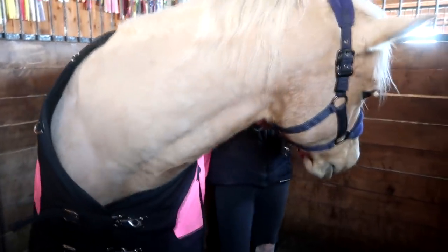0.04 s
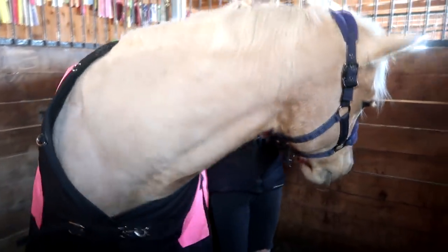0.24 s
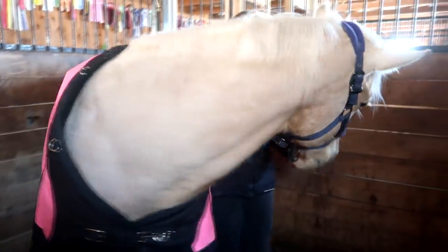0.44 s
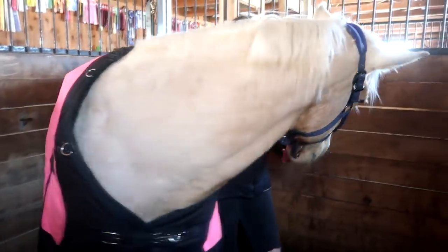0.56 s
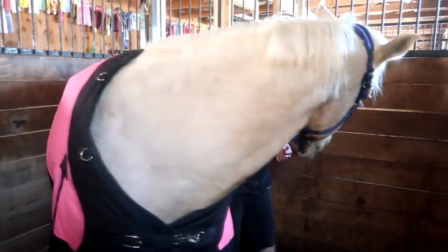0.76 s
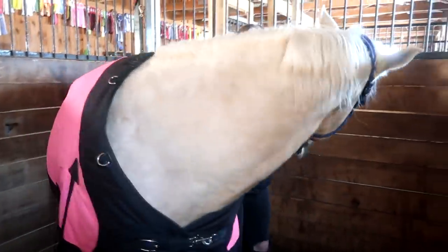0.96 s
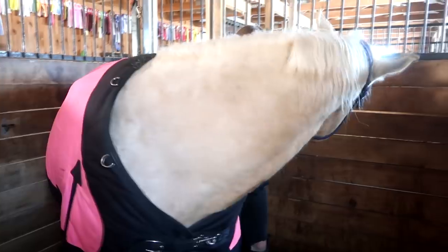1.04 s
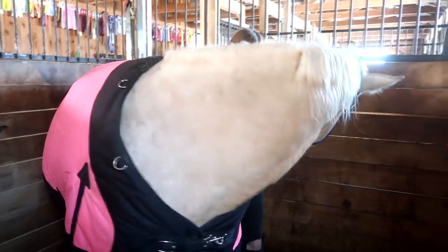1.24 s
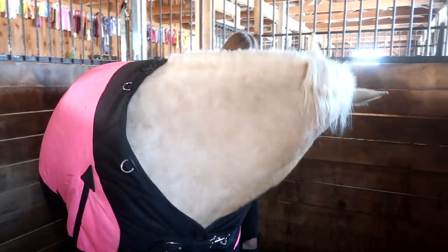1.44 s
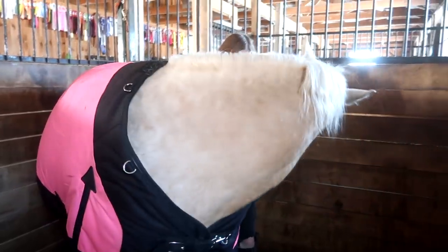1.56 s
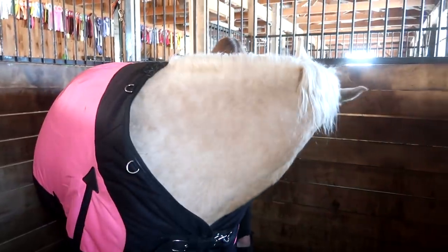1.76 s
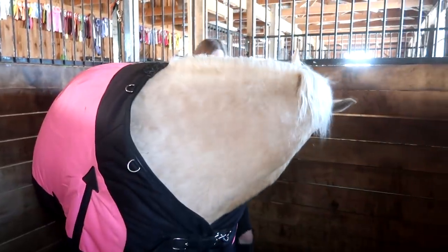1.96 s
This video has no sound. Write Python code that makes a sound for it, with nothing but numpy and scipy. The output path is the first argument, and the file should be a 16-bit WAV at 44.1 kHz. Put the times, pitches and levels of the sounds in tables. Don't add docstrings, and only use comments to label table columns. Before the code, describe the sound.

Hoof knocks and short scrapes on hollow stall boards, with soft bedding rustle in a quiet barn

```python
import sys
import numpy as np
from scipy import signal
from scipy.fft import rfft, irfft
from scipy.io import wavfile
from scipy.ndimage import uniform_filter1d

SR = 44100
rng = np.random.default_rng(int(sys.argv[2]) if len(sys.argv) > 2 else 0)


def wav_out(sig):
    wavfile.write(sys.argv[1], SR, np.round(np.clip(np.atleast_2d(sig).T, -1, 1) * 32767).astype(np.int16))


def to_linear_factor(level_db):
    exponent = np.asarray(level_db, float) / 20
    return 10 ** exponent


N = 88200


def evened(x):
    return x / np.sqrt(np.mean(x ** 2) + 1e-20)


def read(points, hz):
    f, value = np.transpose(points)
    return np.interp(np.log(hz + 1), np.log(f + 1), value)


def add(mix, s, sound):
    part = mix[round(s * SR):][:len(sound)]
    part += sound[:len(part)]


def resonate(x, hz, width):
    turn = np.exp(2j * np.pi * hz * np.arange(len(x)) / SR)
    r = np.exp(-np.pi * width / SR)
    return 2 * (turn * signal.lfilter([1 - r], [1, -r], x / turn)).real


def strokes(rows):
    t = np.arange(N) / SR
    total = np.zeros(N)
    for s, rise, hold, fall, db in rows:
        falling = to_linear_factor(db - fall * np.maximum(t - s - rise - hold, 0))
        total += falling * np.clip((t - s) / rise, 0, 1)
    return total


def grains(per_s, spread_db):
    size = rng.standard_normal(N) * to_linear_factor(spread_db * np.minimum(rng.exponential(1, N), 4))
    return evened(size * (rng.random(N) < per_s / SR))


# (frequency [Hz], level [dB per Hz])
AIR = [(20, -13.5), (45, -3.5), (70, 0.5), (200, -10), (500, -10), (1300, -16), (4900, -29.5), (14800, -50)]
AIR_DB = -49


def air():
    frames, hz = N // 256 + 5, np.fft.rfftfreq(1024, 1 / SR)
    a, b, c, d, patches = rng.standard_normal((frames, 513, 5)).T
    patches = uniform_filter1d(patches, size=12, axis=0)
    patches = evened(uniform_filter1d(patches, size=12, axis=1))
    z = np.array([a + 1j * b, c + 1j * d]) * to_linear_factor(read(AIR, hz)[:, None] + 1.7 * patches)
    return to_linear_factor(AIR_DB) * evened(signal.istft(z, nperseg=1024, noverlap=768)[1][:, :N])


# (time [s], peak level [dB])
CLICKS = [(.285, -48), (.357, -52), (.385, -46.5), (.402, -49), (0.464, -42), (.658, -43), (.686, -43.5),
          (0.691, -45), (.719, -43), (.726, -42), (.753, -46), (.759, -46), (.787, -47), (.986, -46.5),
          (1.003, -50), (1.053, -51), (1.086, -54), (1.107, -45), (1.455, -42), (1.487, -41), (1.553, -50),
          (1.57, -47), (1.62, -42), (1.715, -45), (1.754, -52), (1.77, -41.5), (1.82, -45), (1.97, -45)]
# (frequency [Hz], level [dB], t60 [s])
WING = [(3800, 0.5, 0.012), (4460, -1.5, 0.0098), (4870, -4.5, 0.0075), (5490, -3.5, 0.011)]


def insect():
    out, t = np.zeros(N), np.arange(1000) / SR
    for (s, peak_db), odd in zip(CLICKS, rng.standard_normal((len(CLICKS), len(WING)))):
        ring = 0
        for (hz, db, t60), o in zip(WING, odd):
            ring = ring + to_linear_factor(db + 2.7 * o - 60 * t / t60) * np.sin(2 * np.pi * hz * (1 + 0.023 * o) * t)
        add(out, s - .001, to_linear_factor(peak_db) * np.minimum(t / 0.00087, 1) * ring)
    return out


# (frequency [Hz], t60 [s])
STALL = [(100, 0.49), (400, 0.44), (1000, 0.36), (3000, 0.25), (9000, 0.31)]
STALL_DB, FIRST_ECHO_S = -8, .004


def stall(x):
    taps, first = np.zeros((2, SR // 2)), round(FIRST_ECHO_S * SR)
    at = np.arange(0, SR // 2 - 20, 20)
    at = at + rng.integers(0, 20, (2, len(at)))
    np.put_along_axis(taps, at, rng.choice([-1., 1.], at.shape), 1)
    hz, t, z = signal.stft(taps, SR, nperseg=256)
    tail = signal.istft(z * to_linear_factor(-60 * t / read(STALL, hz)[:, None]), SR, nperseg=256)[1]
    tail = np.pad(tail, ((0, 0), (first, 0)))
    return signal.fftconvolve(x[None], tail / np.linalg.norm(tail[0]), axes=1)[:, :N]


# (time [s], peak level [dB], pitch [Hz], t60 [s])
SNAPS = [
    (1.2345, -30.5, 3020, .012),
    (1.2345, -35, 2200, 0.011),
    (.78, -46, 2550, 0.033),
    (.806, -37, 2600, 0.094),
    (1.37, -43, 2200, 0.018),
    (1.607, -44, 3200, .02),
]


def ticks():
    out, t = np.zeros(N), np.arange(3000) / SR
    for s, peak_db, hz, t60 in SNAPS:
        rise = np.minimum(t / 0.00058, 1)
        add(out, s, to_linear_factor(peak_db - 60 * t / t60) * rise * np.sin(2 * np.pi * hz * t))
    return out


# (start [s], rise [s], hold [s], fall [dB per s], level [dB])
FIZZ = [
    (.11, .015, .02, 400, -66),
    (1.84, .02, .01, 300, -67),
    (1.884, .003, .006, 500, -62.5),
    (.53, .02, .02, 300, -72),
]


def crackle(straw):
    hz = np.fft.rfftfreq(N, 1 / SR)
    fizz = straw / (1 + (11000 / (hz + 1)) ** 10)
    return evened(irfft(fizz, N)) * strokes(FIZZ)


# (frequency [Hz], level [dB per Hz])
GRIT = [(400, -40), (800, -9), (1300, -6.5), (2400, -9), (4000, -15), (6500, -21.5), (10000, -31),
        (14800, -56)]
GRAINS_PER_S, GRAIN_SPREAD_DB, GRIT_TOP_HZ = 14000, 1.5, 11000


def grit(straw):
    hz = np.fft.rfftfreq(N, 1 / SR)
    return straw * to_linear_factor(read(GRIT, hz)) / (1 + (hz / GRIT_TOP_HZ) ** 20)


# (start [s], rise [s], hold [s], fall [dB per s], level [dB])
RUBS = [(.227, 0.002, 0.0082, 157, -42), (1.332, 0.0047, 0.0068, 309, -43), (1.38, 0.15, 0.034, 48, -54.5),
        (1.445, .008, .006, 300, -55.5), (1.5, .02, 0.0086, 252, -56), (1.545, 0.012, 0.01, 303, -54.5),
        (1.6, .008, 0.0084, 300, -54), (.378, 0.011, 0.035, 99, -48), (1.03, 0.0089, 0.017, 200, -55),
        (-.05, 0.039, 0.042, 99, -58), (.155, 0.0026, 0.0079, 199, -48), (0.49, 0.028, 0.035, 154, -55.5)]
RUB_TOP_HZ = 3480


def rubs(straw):
    hz = np.fft.rfftfreq(N, 1 / SR)
    dull = grit(straw) / (1 + (hz / RUB_TOP_HZ) ** 2)
    return evened(irfft(dull, N))[::-1] * strokes(RUBS)


# (start [s], rise [s], hold [s], fall [dB per s], level [dB])
SCUFFS = [
    (0.7948, 0.004, 0.062, 600, -37.5),
    (.87, .01, 0.036, 250, -51),
    (0.492, 0.0092, 0.05, 132, -60.5),
    (0.11, 0.018, 0.016, 199, -43.5),
    (.5, 0.048, 0.021, 209, -50.5),
    (1.831, 0.0052, 0.014, 227, -44),
    (1.95, .04, .05, 100, -56.5),
    (0.435, 0.02, .02, 206.5, -50),
    (1.398, 0.14, 0.08, 73, -55.5),
    (1.884, 0.0029, 0.0035, 598, -59),
]


def scuffs(straw):
    return evened(irfft(grit(straw), N)) * strokes(SCUFFS)


# (start [s], rise [s], hold [s], fall [dB per s], level [dB])
SHUFFLES = [
    (1.547, 0.16, 0.2, 69, -45),
    (-.05, .05, 0.23, 59.5, -48.5),
    (0.39, 0.056, 0.085, 80, -49.5),
    (.82, 0.046, 0.062, 95, -49.5),
]
SHUFFLE_HZ, SHUFFLE_WIDTH_HZ = 173, 294


def shuffles():
    low = resonate(grains(2000, 1.5), SHUFFLE_HZ, SHUFFLE_WIDTH_HZ)
    low = resonate(low, SHUFFLE_HZ, SHUFFLE_WIDTH_HZ)
    return evened(low) * strokes(SHUFFLES)


# (start [s], rise [s], hold [s], fall [dB per s], level [dB])
SCRAPES = [
    (.872, .01, 0.038, 200, -44.5),
    (0.48, 0.03, 0.05, 220, -43),
    (-0.053, .04, 0.061, 158, -48),
    (1.842, 0.0073, 0.015, 122, -38.5),
    (.39, .005, 0.045, 300, -36.5),
]
SCRAPE_HZ, SCRAPE_WIDTH_HZ = 530, 600


def scrapes(jolts):
    loose = resonate(jolts[::-1], SCRAPE_HZ, SCRAPE_WIDTH_HZ)
    loose = resonate(loose, SCRAPE_HZ, SCRAPE_WIDTH_HZ)
    return evened(loose) * strokes(SCRAPES)


# (start [s], rise [s], hold [s], fall [dB per s], level [dB])
DRAGS = [
    (.803, 0.009, 0.053, 1500, -34),
]
# (frequency [Hz], width [Hz], level [dB])
SKID = [(437, 81, -2), (251, 142, -14.5), (678, 83, -2), (1020, 72, -12), (1340, 98, -16)]


def drags(jolts):
    skid = np.zeros(N)
    for k, (hz, width, db) in enumerate(SKID):
        ring = resonate(resonate(jolts, hz, width), hz, 3 * width)
        skid += (-1) ** k * to_linear_factor(db) * ring
    return evened(skid) * strokes(DRAGS)


# (time [s], peak level [dB], pitch [Hz], held [s])
HOLLOWS = [(.3772, -12, 396.5, .011), (.3772, -14.5, 700, 0.0096), (.3776, -16.5, 530, .010),
           (.386, -25.5, 288, 0.0095), (.7948, -21, 492, .008), (.797, -32.5, 137, 0.011),
           (1.835, -29, 138, 0.011), (1.831, -22, 362, 0.0054), (1.833, -25.5, 570, 0.0058),
           (1.832, -29, 740, 0.0076), (.228, -22, 790, 0.01), (.2268, -34, 599, 0.0079),
           (.2268, -30, 1080, .010), (.2268, -31, 1900, 0.005), (.122, -25, 795, 0.012),
           (.121, -34, 560, .005), (.251, -29, 740, 0.0044), (.81, -31, 686, .008),
           (0.39, -30.5, 760, .006), (.393, -26.5, 880, .007), (1.848, -29, 693, 0.0042),
           (.508, -33.5, 600, 0.0049), (.534, -34, 470, .005), (.1557, -39, 950, .006),
           (.145, -34, 700, 0.0045)]
HOLLOW_RISE_S, HELD_DB_PER_S, DAMPED_DB_PER_S = 0.0021, 450, 2500


def hollows():
    out, t = np.zeros(N), np.arange(2000) / SR
    for s, peak_db, hz, held in HOLLOWS:
        loss_db = HELD_DB_PER_S * t + DAMPED_DB_PER_S * np.maximum(t - held, 0)
        rise = np.minimum(t / HOLLOW_RISE_S, 1)
        add(out, s, to_linear_factor(peak_db - loss_db) * rise * np.sin(2 * np.pi * hz * t))
    return out


CRUNCH_S, CRUNCHES_PER_S = 0.0062, 1500


def knocks(rows, modes, uneven_db=1.0):
    out, t = np.zeros(N), np.arange(SR // 4) / SR
    chance = rng.standard_normal((len(rows), len(modes)))
    crunch = rng.standard_normal((len(rows), 2, 800))
    for (s, peak_db, contact_ms, pitch), odd, (size, luck) in zip(rows, chance, crunch):
        contacts = size * np.exp(-t[:800] / CRUNCH_S) * (abs(luck) < 1.25 * CRUNCHES_PER_S / SR)
        contacts[0] = 2.32
        blow = 0
        for k, (hz, db, t60) in enumerate(modes):
            ring = signal.fftconvolve(contacts, to_linear_factor(-60 * t / t60) * np.sin(2 * np.pi * hz * pitch * t))
            blow = blow + (-1) ** k * to_linear_factor(db + uneven_db * odd[k]) * np.sqrt(t60) * evened(ring)
        push = np.sin(np.pi * np.minimum(t[:200] / (contact_ms / 1000), 1)) ** 2
        blow = np.convolve(blow, push)
        add(out, s, to_linear_factor(peak_db) * blow / abs(blow).max())
    return out


# (time [s], peak level [dB], contact [ms], pitch [factor])
TAPS = [
    (.2264, -18.5, .25, 1.01),
    (.1205, -24.5, 0.41, .99),
    (.1555, -27.5, 0.23, 1.05),
    (.251, -26, 0.42, .97),
    (0.019, -33.5, 0.63, 1.014),
    (1.3345, -37, 0.15, 1.12),
    (0.16, -32.5, 0.59, .95),
    (0.31, -55, 0.44, 1.01),
]
# (frequency [Hz], level [dB], t60 [s])
BOARD = [(243, -14.5, 0.036), (526, -7.5, 0.039), (598, -5, .035), (798, -0.5, 0.031), (900, -7, 0.028),
         (1052, -7, 0.029), (1363, -10, 0.019), (1600, -10, .016), (1864, -9.5, 0.016),
         (2200, -12.5, 0.016), (2570, -15.5, 0.016), (2900, -12.5, 0.013), (3500, -18.5, 0.011),
         (4300, -19.5, .01)]


def taps():
    return knocks(TAPS, BOARD)


# (time [s], peak level [dB], contact [ms], pitch [factor])
THUDS = [(.3765, -12, 0.97, 1.027), (.404, -25, 1.2, 0.942), (.412, -26.5, 1.13, 1.105),
         (.795, -27.5, 1.77, 1.2), (1.831, -25, 1.3, 1.082), (.508, -28.5, 1.26, 1.053),
         (.442, -29.5, 1.3, 1.01), (.045, -38.5, 1.4, .95), (0.43, -35.5, 1.1, 1.037),
         (1.85, -30, 1.05, 1.06), (1.887, -31, 0.95, 1.037), (.537, -32, 1.13, 1.0),
         (0.49, -36.5, 1.3, 1.09), (.568, -38, 1.2, .95), (1.839, -28.5, 1.65, .9),
         (1.867, -34.5, 1.2, 1.0)]
# (frequency [Hz], level [dB], t60 [s])
FLOOR = [(95.5, -22, 0.073), (161, -19, .06), (221, -13.5, 0.046), (302, -5, 0.041), (377, -2, 0.027),
         (462, -1.5, 0.033), (558, -3, 0.028), (702, -3, 0.029), (890, -7, .03), (965, -6, 0.025),
         (1166, -11.5, .025)]


def thuds():
    return knocks(THUDS, FLOOR)


# (frequency [Hz], side minus mid [dB])
AIR_SIDE = [(60, -24), (130, -10), (290, -1), (640, -7), (1400, -7), (3090, -4), (6780, 0), (14900, 3.5)]
# (frequency [Hz], side minus mid [dB])
NEAR_SIDE = [(60, -25), (130, -23), (290, -20), (640, -19.5), (1400, -11), (3090, -5.5), (6780, 1.5),
             (14900, 6)]
INSECT_MID_DB = -5.5


def scene():
    straw = rfft(grains(GRAINS_PER_S, GRAIN_SPREAD_DB))
    jolts = grains(2500, 2.0)
    bedding = crackle(straw) + rubs(straw) + scuffs(straw)
    dragging = shuffles() + scrapes(jolts) + drags(jolts)
    near = bedding + dragging + hollows() + taps() + thuds()
    echo, hush, bug = to_linear_factor(STALL_DB) * stall(near), air(), insect()
    near = near + ticks()
    hz = np.fft.rfftfreq(N, 1 / SR)
    around = 1j * rfft(near) + rfft(to_linear_factor(2.5) * echo[1])
    wide = around * to_linear_factor(read(NEAR_SIDE, hz) - 2.0) + rfft(hush[1]) * to_linear_factor(read(AIR_SIDE, hz))
    side = bug + irfft(wide, N)
    mid = near + echo[0] + hush[0] + to_linear_factor(INSECT_MID_DB) * np.roll(bug, 3)
    return np.array([mid + side, mid - side])


def top_cut(x):
    return signal.sosfilt(signal.butter(12, 15000, fs=SR, output="sos"), x)


def record(dry):
    bass_cut = signal.butter(2, 40, "high", fs=SR, output="sos")
    mix = signal.sosfilt(bass_cut, dry)
    return top_cut(mix)


dry = scene()
out = record(dry)
wav_out(out)
```